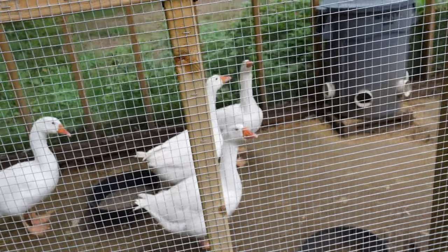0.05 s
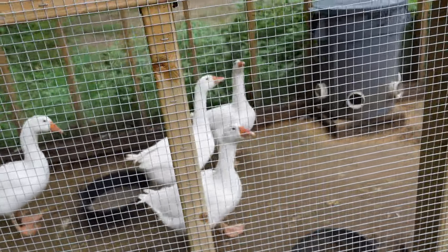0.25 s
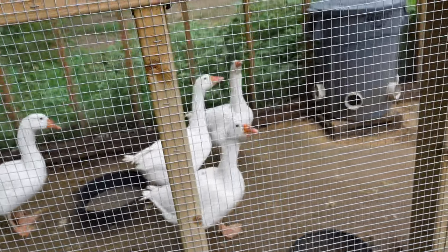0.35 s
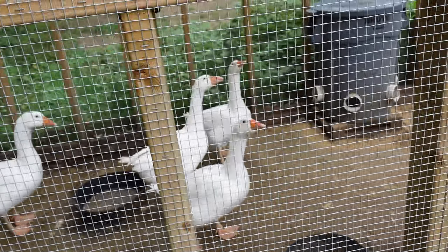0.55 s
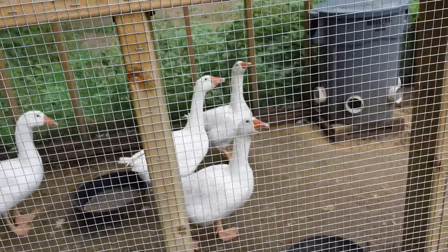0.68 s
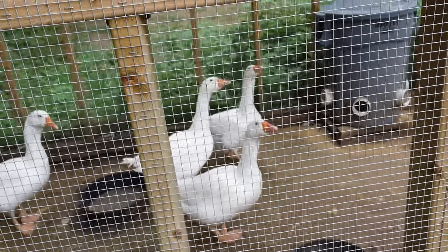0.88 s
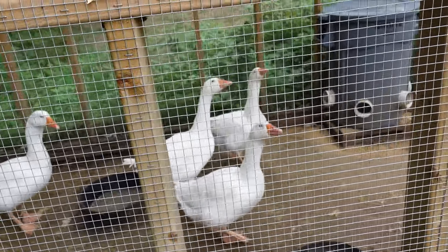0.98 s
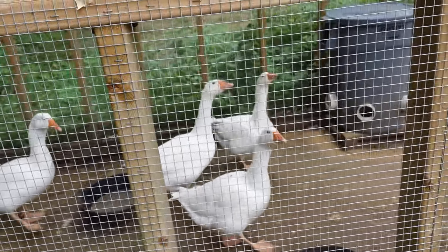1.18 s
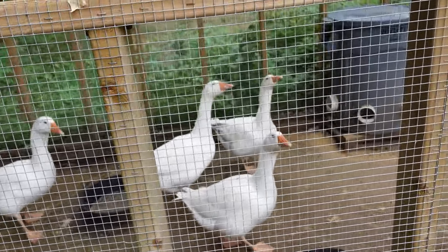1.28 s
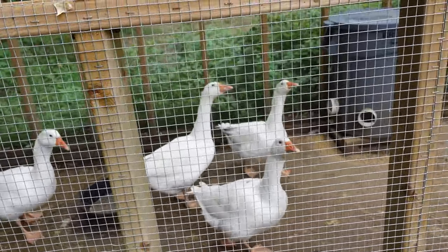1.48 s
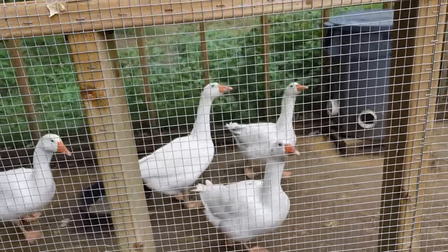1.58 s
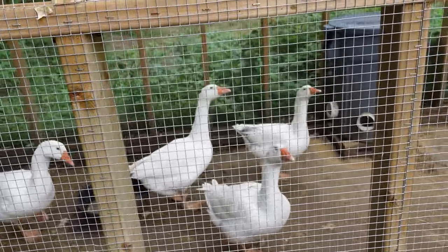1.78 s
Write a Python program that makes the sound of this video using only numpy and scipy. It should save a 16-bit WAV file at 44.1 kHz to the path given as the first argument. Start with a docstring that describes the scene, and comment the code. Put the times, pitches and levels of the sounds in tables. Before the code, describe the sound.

Domestic geese call a few metres away in a small outdoor pen. A tiny tick comes just before one clear honk at about 0.2 seconds. Low rasping cackles follow in a quick run from 0.3 to 1.2 seconds, overlapped by three brassy honks between 0.8 and 1.1 seconds. From about 1.4 to 1.7 seconds there are three very soft hoarse mutters over quiet outdoor air.

```python
"""A tiny tick and a clear honk over quiet garden air: domestic geese in a small fenced pen, a few
metres away. Low rasping cackles follow, then several birds at once, then a few soft hoarse mutters.
Each call is an arch of effort that lifts pitch, level and treble; its pulses ring the bird's long
windpipe. Ground and fence reflect the calls."""
import sys
import numpy as np
from scipy import signal
from scipy.fft import rfft, irfft, next_fast_len
from scipy.io import wavfile

SR = 44100
rng = np.random.default_rng(int(sys.argv[2]) if len(sys.argv) > 2 else 0)


def generate_wav(signal):
    """Clip the signal to [-1, 1] and save it as 16-bit WAV at the path in sys.argv[1]."""
    frames = np.transpose(np.atleast_2d(signal))
    scaled = np.clip(frames, -1, 1) * 32767
    pcm = np.round(scaled).astype(np.int16)
    wavfile.write(sys.argv[1], SR, pcm)


N = 81585


def undb(db):
    """Decibels to gain."""
    return 10 ** (np.asarray(db) / 20)


def unit(x):
    """Scale to rms 1."""
    return x / np.sqrt(np.mean(x ** 2) + 1e-20)


def lowpass(x, hz, order=2):
    """Butterworth low-pass."""
    return signal.sosfilt(signal.butter(order, min(hz, .45 * SR), fs=SR, output="sos"), x)


def below(x, hz):
    """Zero-phase low-pass."""
    return lowpass(lowpass(x, hz, order=3)[::-1], hz, order=3)[::-1]


def colour(x, points, resonances=(), size=4096):
    """Minimum-phase filter from points (hz, gain_db) and resonances (centre_hz, width_hz, lift_db)."""
    hz = np.arange(size // 2 + 1) * SR / size + 1
    point_hz, point_db = np.array(points, float).T
    curve_db = np.interp(np.log(hz), np.log(point_hz), point_db)
    for centre_hz, width_hz, lift_db in resonances:
        curve_db += lift_db / (1 + (2 * (hz - centre_hz) / width_hz) ** 2)
    cepstrum = irfft(np.log(undb(curve_db)))
    cepstrum[1:size // 2] *= 2
    cepstrum[size // 2 + 1:] = 0
    return signal.fftconvolve(x, irfft(np.exp(rfft(cepstrum))))[:len(x)]


def clicks(places, gains, length, half_width=8):
    """Band-limited clicks at fractional sample positions."""
    out = np.zeros(length)
    index = places.astype(int)[:, None] + np.arange(1 - half_width, half_width + 1)
    offset = index - places[:, None]
    shapes = gains[:, None] * np.sinc(offset) * np.sinc(offset / half_width)
    np.add.at(out, np.clip(index, 0, length - 1), shapes)
    return out


def garden(air_db=-61, wobble_db=-51, wobble_hz=13):
    """Quiet outdoor air and a very deep wobble on the microphone."""
    # freq_hz, gain_db
    air_spectrum = [(5, -89.5), (25, -69.5), (50, -80.5), (90, -88.5), (200, -91.5), (500, -101),
                    (1500, -101), (4000, -110), (6000, -110), (7000, -105), (8500, -116), (15000, -125)]
    air = unit(colour(rng.standard_normal(N), air_spectrum))
    slow = lowpass(rng.standard_normal(N), wobble_hz, order=6)
    wobble = unit(slow - lowpass(slow, wobble_hz / 2, order=1))
    return undb(air_db) * air + undb(wobble_db) * wobble


def tick(start_s=.128, peak_db=-52, centre_hz=1735, decay_s=.00095):
    """A tiny click before the first honk, perhaps a bill opening."""
    age_s = np.arange(N) / SR - start_s
    burst = rng.standard_normal(N) * (age_s > 0) * np.exp(-np.abs(age_s) / decay_s)
    band = [(centre_hz / 4, -20), (centre_hz / 2, 0), (centre_hz * 2, -2), (centre_hz * 4, -22)]
    click = colour(burst, band)
    return undb(peak_db) * click / np.abs(click).max()


def voice_pulses(phase, rough, cackling):
    """Pulse train, clean in the low overtones, uneven and airy above. Phase in cycles."""
    # A cackle's slow cycle closes twice more: place_cycles, level_db
    later_closures = [(.32, -8), (.63, -5.5)]
    jitter_s, shimmer_db, hiss_db, rasp_db = .00013, 4, 3, 4  # at rough = 1
    samples = np.arange(len(phase))
    cycles = np.arange(int(phase[-1]))
    steady = unit(clicks(np.interp(cycles, phase, samples), np.ones(len(cycles)), len(phase)))
    uneven = 0
    for place_cycles, level_db in [(.00091, 0)] + (later_closures if cackling else []):
        timing, strength = rng.standard_normal((2, 128))[:, cycles]
        places = np.interp(cycles + place_cycles, phase, samples) + jitter_s * SR * rough * timing
        uneven += clicks(places, undb(level_db + shimmer_db * rough * strength), len(phase))
    bill_air, puff_air = rng.standard_normal((2, N))[:, :len(phase)]
    hiss = bill_air - below(bill_air, hz=4340)  # through the open bill
    rasp = unit(puff_air * np.exp(-(phase % 1)))  # one decaying puff per cycle
    airy = unit(uneven) + np.sqrt(rough) * undb(hiss_db) * hiss + rough * undb(rasp_db) * rasp
    clean_below_hz = (420 if cackling else 1100) * (1.1 - rough)
    return airy + below(steady - airy, clean_below_hz)


def windpipe(source, goose, spread_s=.0021, spread_hz=1900):
    """The long windpipe rings and spreads each pulse: treble leaves later."""
    # Overall colour per goose: freq_hz, gain_db
    voice_spectra = {"first": [(260, -17.5), (410, -6.5), (520, -5), (1000, 4.5), (2000, -17.5),
                     (3400, -12.5), (4200, -26), (6000, -32), (9500, -40.5), (15000, -57.5)],
                     "low": [(220, -5), (330, -9.5), (470, 0.5), (1000, 1), (2000, -16.5), (3300, -14.5),
                     (4100, -27.5), (6600, -34.5), (7600, -44.5), (9000, -36.5), (11000, -50),
                     (15000, -58.5)], "loud": [(240, -32), (370, -17), (500, 5), (1000, -8), (2000, -11),
                     (3300, -11), (4600, -16), (6300, -26.5), (7400, -33.5), (8400, -30.5), (11000, -48),
                     (15000, -45.5)], "brassy": [(240, -39.5), (400, 3), (540, -2), (1100, 0.5),
                     (1700, -8.5), (3200, -9.5), (4200, -15), (6300, -25), (7400, -31.5), (8600, -25),
                     (11000, -45.5), (15000, -49)], "soft": [(400, -18), (1100, -7.5), (1450, 1.5),
                     (2100, -3.5), (2900, -5), (4000, -8.5), (5500, -8), (8500, -31)]}
    # Per goose: centre_hz, width_hz, lift_db
    resonances = {"first": [(1070, 390, -10.5), (1287, 91, 2.5), (1580, 37, 13), (2560, 143, 10.5),
                  (3130, 120, 8), (3257, 270, 8.5)], "low": [(450, 70, -1.5), (750, 63, 11), (930, 80, -4),
                  (1750, 180, 16), (2502, 220, 18), (2991, 120, 12.5), (3290, 73, 10.5)],
                  "loud": [(530, 77, -9), (846, 93, 5), (1183, 220, 8.5), (1654, 310, 8.5), (2106, 120, 9),
                  (2500, 130, 14.5), (2916, 260, 9), (3248, 310, 7.5), (4280, 270, 3.5)],
                  "brassy": [(2226, 200, 1), (2360, 160, 11), (2850, 780, 7.5)], "soft": [(1660, 395, 8),
                  (2122, 250, 12), (2584, 310, 9), (5200, 710, 6.5)]}
    ringing = colour(source, voice_spectra[goose], resonances[goose])
    size = next_fast_len(2 * len(source))
    hz = np.arange(size // 2 + 1) * SR / size
    delay_s = spread_s * np.log1p(hz / spread_hz)
    allpass = np.exp(-2j * np.pi * np.cumsum(delay_s) * SR / size)
    return irfft(rfft(ringing, size) * allpass, size)[:len(source)]


def goose_call(start_s, crest_s, end_s, start_hz, crest_hz, end_hz,
               level_db, dip_db, grain, treble_db, goose, hum_db=None):
    """One arch of effort: pitch, level and treble peak at the crest. Cackles also hum."""
    # Per grain: roughness, 0 to 1
    roughness = {"pure": .07, "clear": .17, "reedy": .33, "hoarse": .6, "breathy": 1}
    rough = roughness[grain]
    attack_s, release_s, edge_treble_db = .003, .0032, -11
    t = np.arange(int((start_s - attack_s) * SR), min(int((end_s + .06) * SR), N)) / SR
    rising = t < crest_s
    edge = np.where(rising, (crest_s - t) / (crest_s - start_s), (t - crest_s) / (end_s - crest_s))
    edge = np.clip(edge, 0, 1)  # 0 at the crest, 1 at both ends

    rise_hz = crest_hz - (crest_hz - start_hz) * edge ** 1.9
    fall_hz = crest_hz - (crest_hz - end_hz) * edge ** 1.7
    arch_hz = np.where(rising, rise_hz, fall_hz)
    waver = np.interp(np.cumsum(arch_hz) / SR, np.arange(128), rng.standard_normal(128))
    pitch_hz = arch_hz * (1 + .012 * rough * waver)
    phase = np.cumsum(pitch_hz) / SR - pitch_hz[0] * attack_s

    cackling = hum_db is not None
    pulses = voice_pulses(phase, rough, cackling)
    bass = lowpass(pulses, hz=2040, order=1)
    source = bass + (pulses - bass) * undb(treble_db + edge_treble_db * edge ** 2)
    attack = np.clip((t - t[0]) / attack_s, 0, 1)
    release = np.clip(1 - (t - end_s) / release_s, 0, 1)
    swell = undb(-dip_db * edge ** 2.76) * attack * release
    voice = undb(level_db) * unit(windpipe(source * swell, goose)) * np.sqrt(np.mean(swell ** 2))
    if cackling:  # the hum follows effort more steeply than the voice
        voice += undb(hum_db) * np.sqrt(2) * swell ** 2 * np.sin(2 * np.pi * phase)
    out = np.zeros(N)
    out[np.round(t * SR).astype(int)] = voice
    return out


def pen(direct, tail_db=-15, scatter_db=-1):
    """Close echoes, treble scattered by mesh and posts, and a short tail that dulls as it fades."""
    # Ground, posts and bin: delay_s, level_db
    echoes = [(.0021, -13.5), (.0083, -17), (0.0166, -16)]
    low_t60_s, treble_t60_s, build_s, scatter_decay_s = .27, .24, .014, .0041
    t = np.arange(SR // 2) / SR
    noise, mesh = rng.standard_normal((2, len(t)))
    low = lowpass(noise, hz=3000, order=1)
    tail = low * undb(-60 * t / low_t60_s) + (noise - low) * undb(-60 * t / treble_t60_s)
    tail -= below(tail, hz=650)  # bass escapes the open pen
    tail *= 1 - np.exp(-(t / build_s) ** 2)
    scatter = (mesh - below(mesh, hz=1600)) * np.exp(-t / scatter_decay_s)
    delay_s, level_db = np.array(echoes).T
    response = clicks(delay_s * SR, undb(level_db), len(t))
    response += undb(tail_db) * tail / np.linalg.norm(tail)
    response += undb(scatter_db) * scatter / np.linalg.norm(scatter)
    return direct + signal.fftconvolve(direct, response)[:N]


def scene():
    """Geese in their pen, over the garden air."""
    # start_s, crest_s, end_s, start_hz, crest_hz, end_hz, level_db, dip_db, grain, treble_db, goose
    honks = [(0.183, 0.229, 0.27, 403.4, 516.7, 423, -25, 4, "reedy", -2, "first"),
             (0.817, 0.882, .956, 429.4, 564.6, 432.8, -20, 9.5, "pure", -0.5, "brassy"),
             (.925, 0.956, .988, 477.7, 516.3, 502.5, -20.5, 9, "clear", -4.5, "brassy"),
             (1.036, 1.047, 1.125, 490, 522, 347.6, -27, 3, "reedy", 10, "loud")]
    # As honks, plus hum_db
    cackles = [(0.33, 0.384, 0.44, 129.9, 161.3, 154.9, -23.5, 9.2, "reedy", 9.5, "low", -42.5),
               (0.486, 0.546, 0.61, 148.7, 162.9, 148.9, -22.5, 7.6, "clear", 12.5, "low", -38.5),
               (0.647, 0.7, .788, 152.9, 179.9, 150.2, -18, 13.7, "reedy", -2.5, "loud", -45.5),
               (.69, 0.749, .785, 154.4, 168.2, 157.7, -27.5, 9.2, "reedy", 3.5, "low", -42),
               (0.774, 0.828, .91, 126.6, 143.5, 128.3, -24.5, 1.7, "hoarse", -5.5, "loud", -52.5),
               (0.966, 1.004, 1.031, 138.2, 151.8, 148.9, -25.5, 1.4, "hoarse", 2, "loud", -50.5),
               (1.024, 1.057, 1.11, 148.5, 159.4, 146, -25, 5.8, "reedy", 9.5, "low", -45),
               (1.028, 1.053, 1.066, 162.9, 179.9, 163.7, -24.5, 3.9, "hoarse", -27, "loud", -50),
               (1.1, 1.157, 1.2207, 155.8, 166, 164.1, -25, 4.1, "hoarse", 2.5, "loud", -52)]
    # As honks
    mutters = [(1.357, 1.398, 1.48, 169.6, 197, 168, -57.5, 16, "breathy", -19, "soft"),
               (1.456, 1.537, 1.62, 170.7, 209.3, 184.5, -65, 2, "breathy", 25, "soft"),
               (1.586, 1.624, 1.68, 164.4, 205.8, 171.3, -57.5, 10.3, "breathy", -3, "soft")]
    geese = sum(goose_call(*row) for row in honks + cackles + mutters)
    return (pen(geese + tick()) + garden())[None]


def record(dry, cutoff_hz=15750):
    """Steep elliptic low-pass."""
    return signal.sosfilt(signal.ellip(10, .2, 80, cutoff_hz, fs=SR, output="sos"), dry)


dry = scene()
out = record(dry)
generate_wav(out)
```